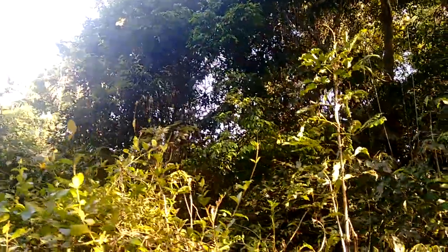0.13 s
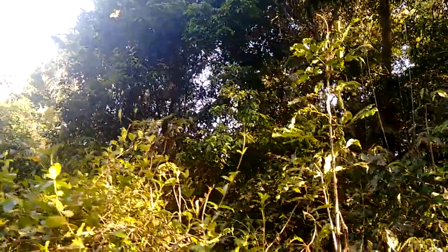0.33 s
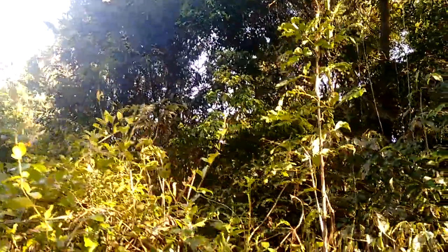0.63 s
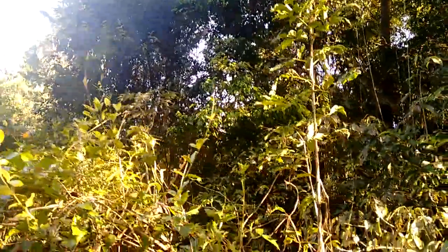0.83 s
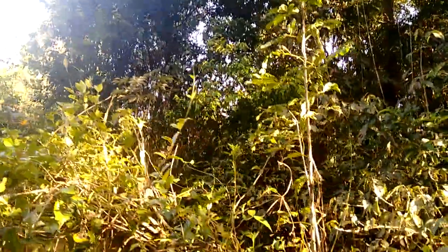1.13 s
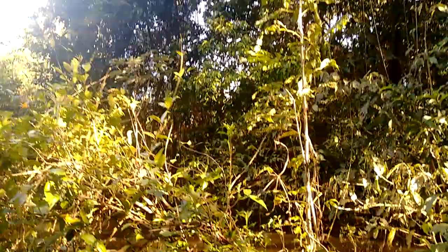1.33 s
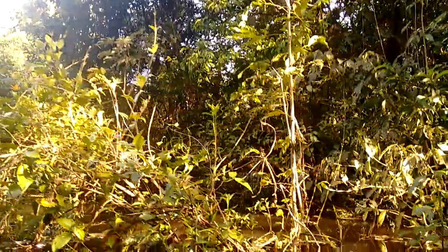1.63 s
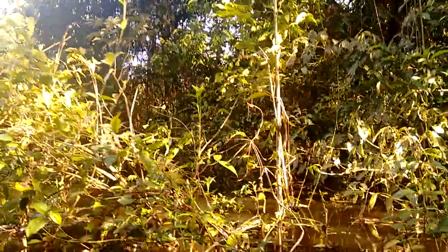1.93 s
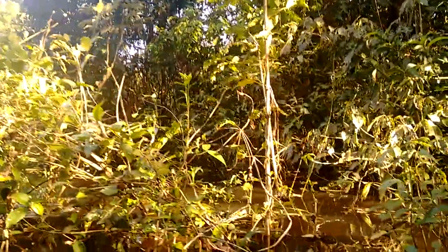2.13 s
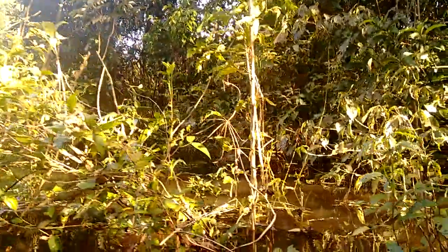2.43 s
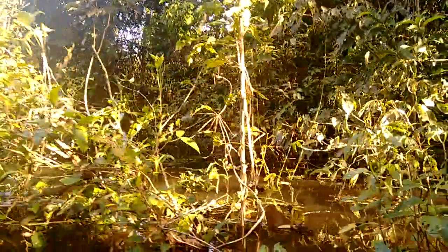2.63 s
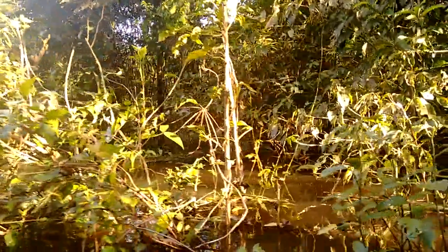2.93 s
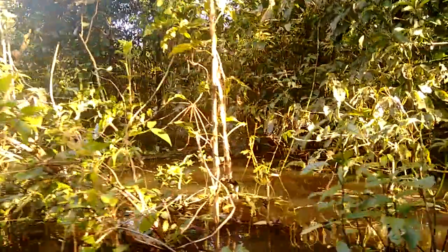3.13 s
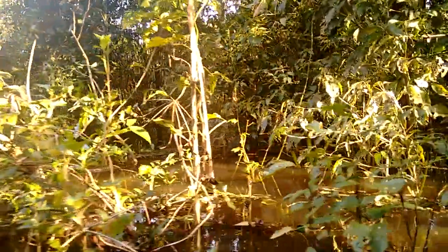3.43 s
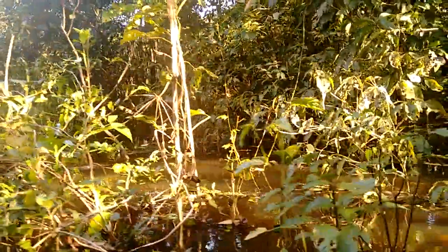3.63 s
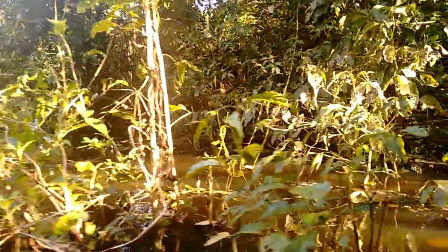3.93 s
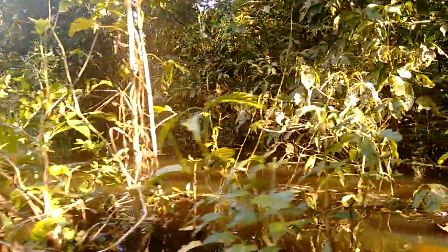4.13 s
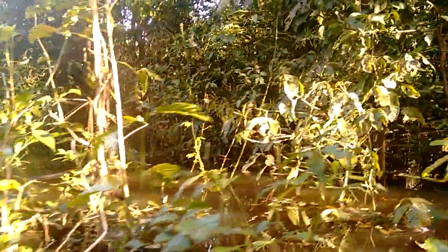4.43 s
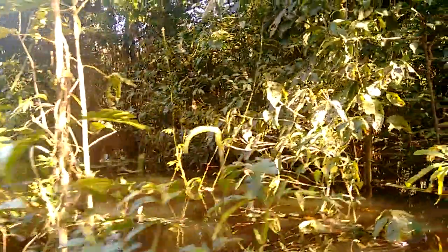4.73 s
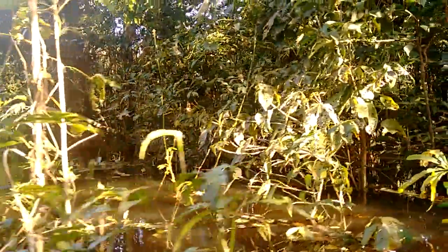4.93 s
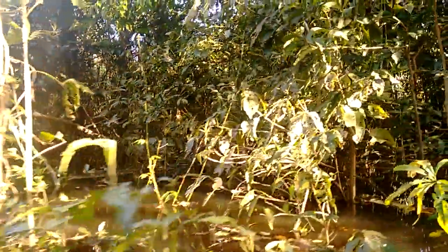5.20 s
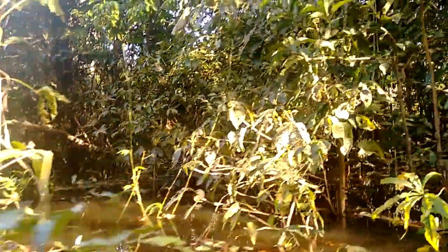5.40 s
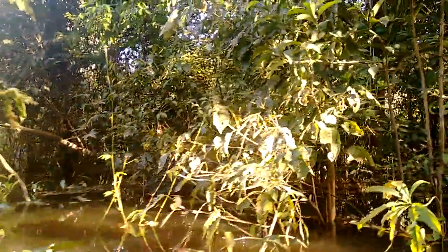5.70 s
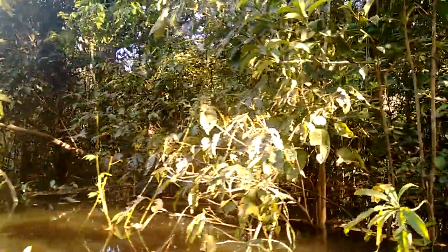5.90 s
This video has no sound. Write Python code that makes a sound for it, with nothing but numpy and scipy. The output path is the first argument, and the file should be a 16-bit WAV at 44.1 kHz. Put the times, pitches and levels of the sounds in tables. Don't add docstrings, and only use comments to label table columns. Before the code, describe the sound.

Distant howler monkeys rasp, fade to scattered grunts and roar up again, under shrill crickets and cicadas, with boat knocks and water drips.

```python
import sys
import numpy as np
from scipy import signal
from scipy.fft import rfft, irfft, next_fast_len
from scipy.io import wavfile
from scipy.ndimage import uniform_filter1d

SR = 44100
rng = np.random.default_rng(int(sys.argv[2]) if len(sys.argv) > 2 else 0)


def how_loud(loudness_db):
    steps = np.asarray(loudness_db, float) / 20
    return 10 ** steps


def materialize(psi):
    bounded = np.clip(np.atleast_2d(psi).T, -1, 1)
    quanta = np.round(bounded * 32767).astype(np.int16)
    wavfile.write(sys.argv[1], SR, quanta)


N = 267201

# pitch_hz, t60_s
FOREST_DECAY = [(200, 0.92), (1000, 0.81), (4000, 0.64)]

FOLDS_PER_S, BREATH_SHARE = [62, 78, 95], 0.57
SAC_WIDTH_HZ = 141.5
TROOP_SAC_HZ, GULLET_HZ, MOUTH_HZ = 328.4, 495, 886
TROOP_CHEST_DB, TROOP_GULLET_DB, ROAR_CHEST_DB, ROAR_GULLET_DB = -2, -6, -8.5, -18
ROAR_RISE_S, ROAR_FALL_S, GASP_RISE_S, GASP_FALL_S = 0.02, 0.12, 0.043, 0.07
# start_s, level_db, mouth_db against the sac
TROOP = [(0.0, -39.5, -7), (0.52, -43, -7), (1.23, -49.5, 0), (2.34, -56, -4.5), (2.8, -60.5, -2.5),
         (3.26, -53.5, -2.5), (3.58, -55.5, -3.5), (4.17, -57.5, -1.5), (4.57, -41.5, -10),
         (4.71, -45, -0.5), (5.11, -42.5, 4.5), (5.33, -38, -3.5), (5.48, -34, -3), (6.06, -31, -3)]
# start_s, length_s, level_db, sac_hz, mouth_db against the sac
ROARS = [(-.04, 0.093, -27.5, 330, -2.5), (0.11, .17, -52, 302, -27), (0.294, 0.057, -66, 380, -26),
         (0.401, 0.23, -43, 330, -36), (.585, .13, -40.5, 330, -14), (0.711, 0.18, -56.5, 345, -2.5),
         (0.882, 0.066, -33, 358, -9), (1.795, 0.13, -50.5, 368, -19), (1.953, 0.13, -68, 351, -10),
         (2.68, 0.31, -48.5, 330, -19), (3.093, 0.3, -71, 340, 4), (3.607, 0.096, -64, 338, 15),
         (3.713, 0.18, -40, 298, -6), (3.906, 0.099, -49.5, 384, -15), (4.035, 0.19, -42, 324, -9),
         (4.11, 0.28, -50.5, 327, 2.5), (4.525, 0.21, -50, 300, -2), (4.832, 0.3, -38, 317, -18),
         (5.02, 0.33, -47, 306, -9), (5.274, 0.27, -39.5, 350, -5), (5.615, 0.34, -46.5, 357, 2.5),
         (5.94, .25, -54, 333, -20.5)]
# start_s, length_s, level_db, pitch_hz
GASPS = [
    (0.47, 0.028, -54, 505),
    (.95, 0.37, -50.5, 540),
    (2.392, 0.34, -56, 492),
    (3.616, 0.064, -52.5, 610),
    (4.209, 0.076, -36.5, 550),
    (4.554, 0.14, -38, 513),
    (5.195, 0.11, -39, 543),
]
# pitch_hz, width_hz, level_db
CHEST = [(236.7, 126, -1.3), (174, 70, -10)]
# pitch_hz, width_hz, level_db
LIPS = [(1000, 110, -3), (1115, 110, -6), (1242, 60, -14), (740, 170, -4)]
ROAR_EDGES_HZ = [228.4, 990]
# start_s, length_s, level_db, start_pitch_hz, end_pitch_hz
GRUNTS = [(0.093, 0.16, -43, 324, 350), (0.287, 0.084, -44.5, 370, 392), (0.426, 0.18, -37.5, 340, 330),
          (0.588, 0.099, -37.5, 372, 366), (.87, 0.051, -44, 365, 340), (2.723, 0.15, -45, 367, 336),
          (3.106, .17, -57.5, 796, 750), (3.606, .06, -53, 940, 940), (3.72, 0.12, -60, 330, 258),
          (3.73, 0.17, -53.5, 790, 930), (4.061, 0.063, -36.5, 300, 300), (4.099, 0.081, -53.5, 1150, 1150),
          (4.535, 0.15, -35, 280, 294)]

# start_s, level_db, nearest_db against the chorus, chirps_per_s
CRICKETS = [(0, -43, -5, 25.5), (.6, -43, -4, 25.6), (1.5, -43.5, -5, 25.6), (2.5, -43, -4, 25.8),
            (3.5, -43.5, -4, 25.9), (4.4, -43, -4, 25.8), (4.9, -42, -1, 26.3), (5.4, -41.5, -.5, 26.6),
            (6.06, -40.5, 0, 26.7)]
# pitch_hz, width_hz, level_db
WINGS = [(6297, 130, -1), (6073, 210, -4), (6437, 410, -2), (6650, 240, -13), (7120, 166, -11)]

# (start_s, length_s, level_db, pitch_hz)
CICADAS = [
    (62, -56.5, 53, 0.12, [(-.2, 0.73, -50.5, 9090), (.58, 1.44, -50, 9070), (2.07, 0.91, -48, 9020), (5.4, 1.2, -52, 9080)]),
    (270, -61, 350, 0.16, [(-.2, 0.81, -45, 9390), (.5, 2.92, -46.5, 9320), (3.15, 0.83, -50, 9390), (4.08, 2.1, -48.5, 9410)]),
    (114, -69, 450, 0.27, [(-.5, .75, -51, 10240), (.4, 2.38, -55.5, 10110), (3.05, 2.13, -54, 10120), (5.55, 0.55, -60, 10150)]),
]
# start_s, length_s, level_db
KATYDID = [
    (-.05, 0.46, -52),
    (0.467, 0.24, -46),
    (0.796, 0.39, -48.5),
    (1.191, .78, -50),
    (3.977, 0.14, -42),
    (4.264, 0.27, -47.5),
    (4.678, 0.31, -51),
    (5.064, 0.36, -51.5),
]
KATYDID_REST_DB, KATYDID_EDGE_S = -66, 0.14
# pitch_hz, width_hz, level_db
KATYDID_WING = [(8540, 88, -3), (8760, 70, -1.5), (8120, 300, -10)]
# pitch_hz, width_hz, level_db
FAR_SINGERS = [(15000, 16, -81), (15060, 16, -84), (8110, 160, -69)]

# pitch_hz, level_db per Hz
AIR = [(15, 9), (55, -1.5), (82, 4), (130, -6), (400, -0.5), (1100, -12.5), (1900, -12.5), (2350, -23),
       (2900, -15), (4000, -12), (4800, -28.5), (5500, -16.5)]
# pitch_hz, level_db per Hz
HISS = [(4800, -18.5), (5600, -5), (7600, 1.5), (8300, -3.5), (9200, 15.5), (10000, -10), (10500, -11.5),
        (12200, -8.5), (13500, -13.5), (15000, -9), (15500, -44)]
AIR_DB, HISS_DB = -51, -47.5

# start_s, level_db, bright_db
KNOCKS = [
    (1.562, -32, -2.5),
    (1.581, -23, -21),
    (1.701, -30.5, -34),
    (1.718, -25.5, -4),
]
# pitch_hz, level_db, t60_s
HULL = [(330, -4.5, 0.11), (648, -1.5, 0.032), (970, -4, 0.047), (1610, 1.5, 0.0042)]
DULL_PER_OCTAVE = 0.31
# start_s, level_db, pitch_hz
DRIPS = [(0.1111, -41.5, 3830), (0.865, -30.5, 3830), (0.877, -50.5, 3900), (0.914, -35, 2570),
         (1.051, -38, 3900), (1.097, -36, 3520), (1.1228, -36, 3200), (2.947, -40, 3950),
         (3.5, -43.5, 3680), (3.698, -64, 3670), (3.7413, -34, 2010), (3.9705, -39, 3900),
         (4.0577, -40, 4000), (4.1051, -42, 3600), (4.1685, -51, 3280), (4.1923, -46, 3550),
         (4.366, -36.5, 3930), (4.515, -34.5, 2790)]
# start_s, length_s, level_db, pitch_hz
RUSTLES = [
    (1.094, .45, -56.5, 3220),
    (1.842, 1.13, -61, 4240),
]

# pitch_hz, likeness 0-1, left_lead_rad, left_over_right_db
PORTS = [(40, .8, 3.1, .5), (95, .55, 3.1, 1), (140, .5, -.1, 3), (320, .84, 0, 1), (560, .8, -.3, 2),
         (900, .96, 0, 1), (1300, .9, 0, 0), (1500, .3, 2.8, -1), (2800, .28, 2.9, -2), (3200, .4, -.1, -1),
         (4400, .4, -.1, -1), (5200, .05, -.5, -2), (6000, .68, -.2, -1), (6500, .66, -.2, -1.5),
         (6700, .15, 1.1, -2), (7500, .47, 2.9, -4), (8500, .55, -.3, 0), (8750, .5, -.3, -.5),
         (9300, .18, 1.4, -1), (10150, .46, 2, -6), (11000, .1, 3, -5), (15000, .1, 3, -3)]


def evened(x):
    return x / np.sqrt(np.mean(x ** 2) + 1e-20)


def read(points, hz):
    f, *columns = np.transpose(points)
    return [np.interp(np.log(hz + 1), np.log(f + 1), c) for c in columns]


def follow(rows):
    s, *columns = np.transpose(rows)
    return [np.interp(np.arange(N) / SR, s, c) for c in columns]


def drift(samples):
    return evened(uniform_filter1d(uniform_filter1d(rng.standard_normal(N), samples), samples))


def swell(s, length, rise_s, fall_s):
    t = np.arange(N) / SR - s
    return np.clip(np.minimum(t / rise_s, (length - t) / fall_s), 0, 1)


def add(mix, s, sound):
    part = mix[round(s * SR):][:len(sound)]
    part += sound[:len(part)]


def resonate(x, hz, width_hz, order=2):
    turn = np.exp(2j * np.pi * np.cumsum(hz * np.ones(len(x))) / SR)
    r = np.exp(-np.pi * width_hz / SR)
    slow = x / turn + 1e-18
    for _ in range(order):
        slow = signal.lfilter([1 - r], [1, -r], slow)
    return evened((turn * slow).real)


def cavities(x, modes):
    out = 0
    for hz, width_hz, db in modes:
        pole = np.exp((2j * hz - width_hz) * np.pi / SR)
        out = out + how_loud(db) * evened(signal.lfilter([1], np.poly([pole, pole]), x).real)
    return out


def scatter(x, decay, start_s):
    taps = np.zeros((3, SR // 2))
    at = np.arange(round(start_s * SR), SR // 2 - 20, 20)
    at = at + rng.integers(0, 20, (3, len(at)))
    np.put_along_axis(taps, at, rng.choice([-1., 1.], at.shape), 1)
    hz, t, z = signal.stft(taps, SR, nperseg=256)
    fade = how_loud(-60 * t / read(decay, hz)[0][:, None])
    tails = signal.istft(z * fade, SR, nperseg=256)[1]
    phase = np.arange(N) / SR * 3 + np.arange(3)[:, None] / 3
    turns = np.cos(np.pi * phase) * np.sqrt(2 / 3)
    return signal.fftconvolve(x * turns, tails / np.linalg.norm(tails[0]), axes=1)[:, :N].sum(0)


def folds(per_s, jitter=.3, uneven_db=1.8):
    turns = np.cumsum(per_s * np.exp(jitter * drift(500) + .15 * drift(9000))) / SR
    slap = np.diff(np.floor(turns), prepend=0)
    strength = how_loud(uneven_db * np.clip(rng.standard_normal(900), -2, 1.6))[turns.astype(int)]
    puffs = (0.33 + np.exp(-(turns % 1) / 0.46)) * rng.standard_normal(N)
    return strength * ((1 - BREATH_SHARE) * evened(slap) + BREATH_SHARE * evened(puffs))


def monkeys():
    troop_db, open_db = follow(TROOP)
    troop = how_loud(troop_db)
    roars = [how_loud(db) * swell(s, length, ROAR_RISE_S, ROAR_FALL_S) for s, length, db, _, _ in ROARS]
    gasps = [how_loud(db) * swell(s, length, GASP_RISE_S, GASP_FALL_S) for s, length, db, _ in GASPS]
    near = sum(roars)
    sac_gain = troop + near
    chest_gain = troop * how_loud(TROOP_CHEST_DB) + near * how_loud(ROAR_CHEST_DB)
    hum = troop * how_loud(TROOP_GULLET_DB) + near * how_loud(ROAR_GULLET_DB)
    gullet_gain = hum + sum(gasps)
    mouth_gain = troop * how_loud(open_db) + sum(g * how_loud(row[4]) for g, row in zip(roars, ROARS))
    roar_pull = sum(g * row[3] for g, row in zip(roars, ROARS))
    sac_hz = (troop * TROOP_SAC_HZ + roar_pull) / sac_gain
    gasp_pull = sum(g * row[3] for g, row in zip(gasps, GASPS))
    gullet_hz = (hum * GULLET_HZ + gasp_pull) / gullet_gain
    drive = sum(folds(per_s) for per_s in FOLDS_PER_S) * how_loud(.9 * drift(600))
    drive = drive / np.sqrt(uniform_filter1d(drive ** 2, 1500))
    sac = resonate(drive, sac_hz * (1 + 0.059 * drift(1500)), SAC_WIDTH_HZ)
    chest = evened(cavities(drive, CHEST))
    gullet = resonate(drive, gullet_hz * (1 + .03 * drift(2500)), 100)
    mouth = resonate(drive, MOUTH_HZ * (1 + .04 * drift(2500)), 120) + cavities(drive, LIPS)
    roar = sac_gain * sac + chest_gain * chest + gullet_gain * gullet
    roar = roar + how_loud(-1.5) * mouth_gain * evened(mouth)
    throat = signal.butter(3, ROAR_EDGES_HZ, "band", fs=SR, output="sos")
    roar = signal.sosfilt(throat, roar)
    return roar + how_loud(-7.5) * scatter(roar, FOREST_DECAY, .012)


def crickets():
    db, near_db, per_s = follow(CRICKETS)
    turns = (np.cumsum(per_s) / SR + 0.33) % 1
    three = [(.22, .45), (.47, .6), (.74, 1.2)]
    strokes = sum(g * np.exp(-((turns - at) / .085) ** 2) for at, g in three)
    near = resonate(rng.standard_normal(N), 6196, 265) * evened(strokes)
    chorus = evened(cavities(rng.standard_normal(N), WINGS)) * how_loud(0.13 * drift(600))
    return how_loud(db - 0.5) * (chorus + how_loud(near_db) * near)


def clicks():
    return rng.standard_normal(N) * (rng.random(N) < .08)


def katydid():
    gain = how_loud(KATYDID_REST_DB)
    for s, length, db in KATYDID:
        gain = gain + how_loud(db) * swell(s, length, KATYDID_EDGE_S, KATYDID_EDGE_S)
    return gain * evened(cavities(clicks(), KATYDID_WING))


def cicadas():
    out = np.zeros(N)
    for width_hz, rest_db, sag_hz, swell_s, phrases in CICADAS:
        efforts = np.array([swell(s, length, swell_s, swell_s) for s, length, _, _ in phrases]) + 1e-6
        _, _, db, top_hz = np.transpose(phrases)
        gain = how_loud(rest_db) + how_loud(db) @ efforts
        effort = efforts.sum(0)
        hz = top_hz @ efforts / effort - sag_hz * (1 - np.minimum(effort, 1))
        out = out + gain * how_loud(0.2 * drift(500)) * resonate(clicks(), hz, width_hz)
    out = out + gain * how_loud(-16.0) * cavities(clicks(), [(11550, 1500, 0.12)])
    return out + cavities(clicks(), FAR_SINGERS)


def air(shape, db, patchy_db):
    frames, hz = N // 256 + 5, np.fft.rfftfreq(1024, 1 / SR)
    a, b, patches = rng.standard_normal((frames, 513, 3)).T
    patches = evened(uniform_filter1d(uniform_filter1d(patches, 12, 0), 14, 1))
    inside = (hz < shape[-1][0] * 1.05) & (hz > shape[0][0] * .95)
    colour = (how_loud(read(shape, hz)[0]) * inside)[:, None]
    z = (a + 1j * b) * colour * how_loud(patchy_db * patches)
    return how_loud(db) * evened(signal.istft(z, nperseg=1024, noverlap=768)[1][:N])


def grunts():
    out, drive = np.zeros(N), folds(80, jitter=0.061, uneven_db=0.0)
    for s, length, db, start_hz, end_hz in GRUNTS:
        part = drive[round(s * SR):][:round(length * SR)]
        hz = np.linspace(start_hz, end_hz, len(part))
        ring = resonate(part, hz, 41.0)
        ring = ring + 0.12 * resonate(part, hz + 75, 61) + 0.15 * resonate(part, hz - 70, 72)
        add(out, s, how_loud(db) * evened(ring) * signal.windows.tukey(len(part), .15))
    return out + how_loud(-12.0) * scatter(out, FOREST_DECAY, 0.014)


def knock(bright_db, t):
    ring = 0
    for hz, db, t60 in HULL:
        detune = rng.uniform(0.98, 1.03)
        tilt_db = DULL_PER_OCTAVE * (bright_db + 16) * np.log2(hz / 700)
        ring = ring + how_loud(db + tilt_db - 60 * t / t60) * np.sin(2 * np.pi * hz * detune * t)
    crack = resonate(rng.standard_normal(len(t)), 2560, 2900)
    crack = crack * how_loud(-60 * t / 0.011) * np.minimum(t / 0.00048, 1)
    return ring + how_loud(bright_db + 8) * crack


def drip(hz, t):
    ping = np.sin(2 * np.pi * hz * t * (1 + 12 * t)) * .6
    splash = resonate(rng.standard_normal(len(t)), hz, 3000)
    return how_loud(-60 * t / .016) * np.minimum(t / .0005, 1) * (ping + splash)


def boat():
    out, t = np.zeros(N), np.arange(3000) / SR
    for s, db, bright_db in KNOCKS:
        add(out, s, how_loud(db - 3) * knock(bright_db, t))
    for s, db, hz in DRIPS:
        add(out, s, how_loud(db - 4) * drip(hz, t))
    return out + how_loud(-19) * scatter(out, FOREST_DECAY, .008)


def leaves():
    crackle = rng.standard_normal(N) * (rng.random(N) < .2)
    out = np.zeros(N)
    for s, length, db, hz in RUSTLES:
        out = out + how_loud(db) * swell(s, length, 0.045, .15) * resonate(crackle, hz, 1800)
    return out


def scene():
    field = monkeys() + crickets() + katydid() + cicadas()
    field = field + air(AIR, AIR_DB, 0.98) + air(HISS, HISS_DB, 0.83)
    field = field + grunts() + boat() + leaves()
    return np.array([field, field])


def low_pass(x):
    return signal.sosfilt(signal.butter(12, 15500, fs=SR, output="sos"), x)


def record(dry):
    size = next_fast_len(N)
    same, lead, balance_db = read(PORTS, np.fft.rfftfreq(size, 1 / SR))
    same = np.clip(same, 0, 1)
    direct = rfft(dry[0], size) * np.sqrt((1 + same) / 2)
    diffuse = rfft(scatter(dry[0], [(100, .25), (10000, .25)], .001), size)
    diffuse = diffuse * np.sqrt((1 - same) / 2)
    tilt = how_loud(balance_db / 2) * np.exp(.5j * lead)
    ports = np.array([(direct + diffuse) * tilt, (direct - diffuse) / tilt])
    return low_pass(irfft(ports, size)[:, :N])


dry = scene()
out = record(dry)
materialize(out)
```